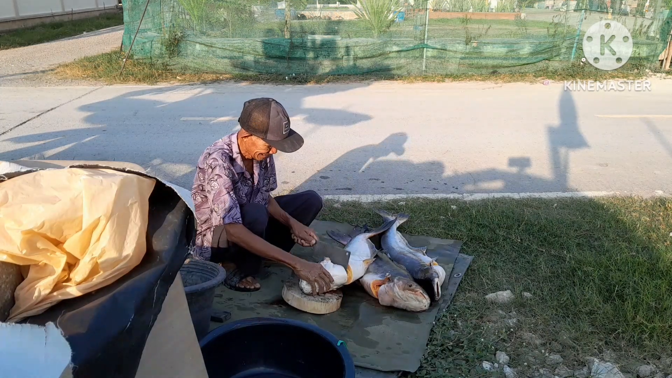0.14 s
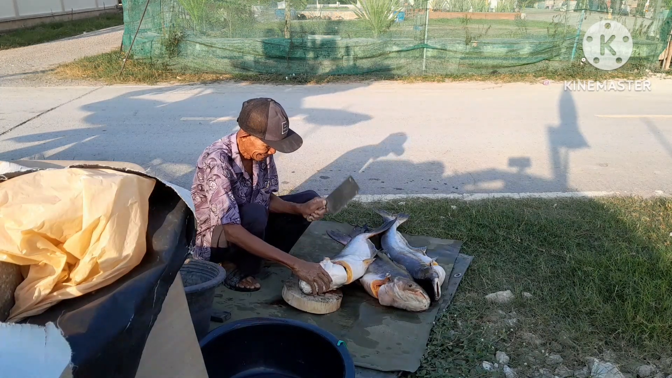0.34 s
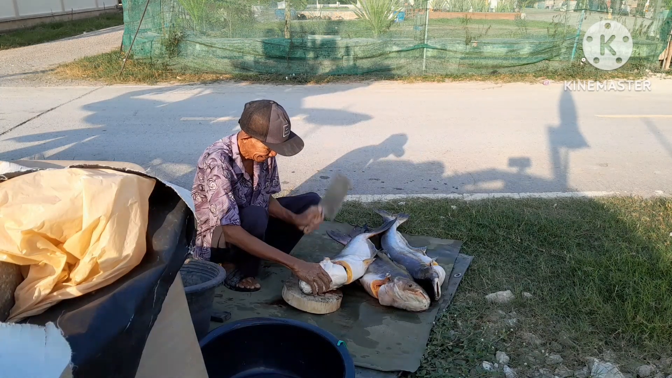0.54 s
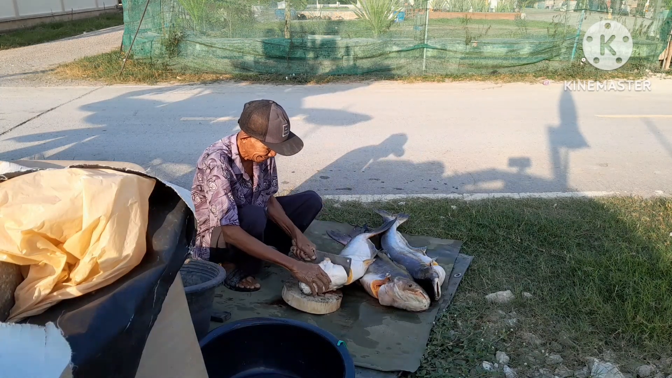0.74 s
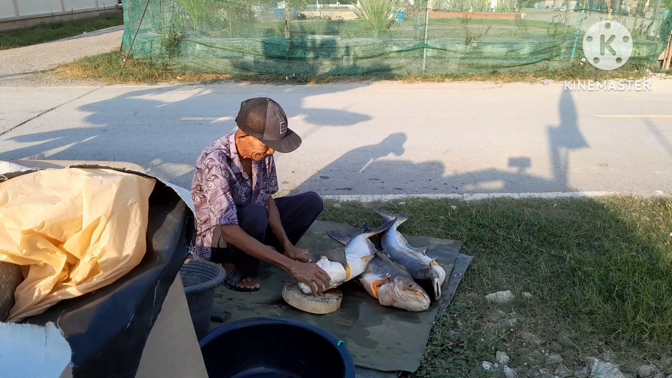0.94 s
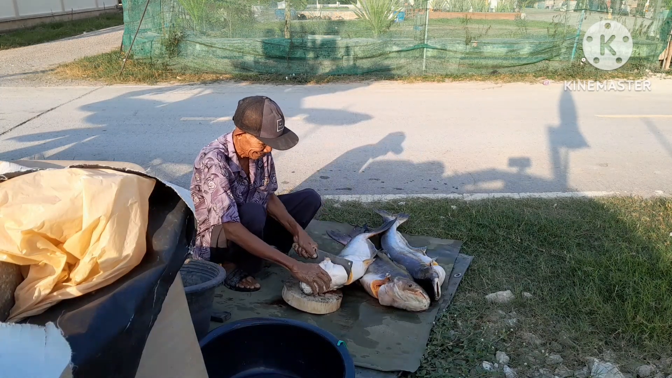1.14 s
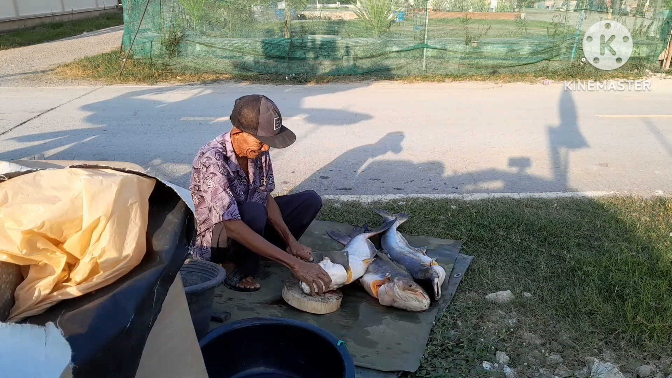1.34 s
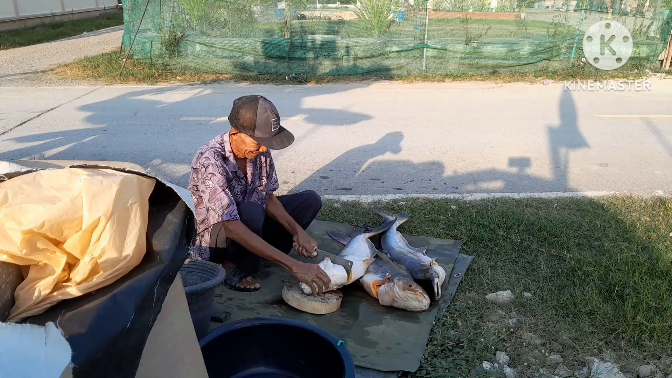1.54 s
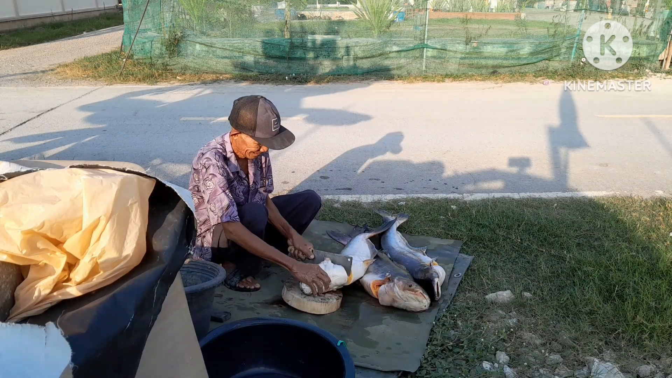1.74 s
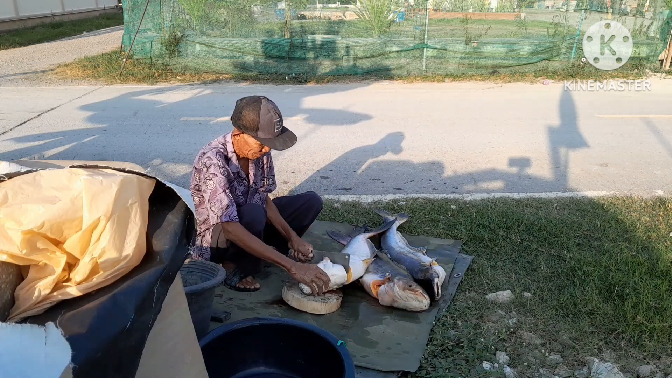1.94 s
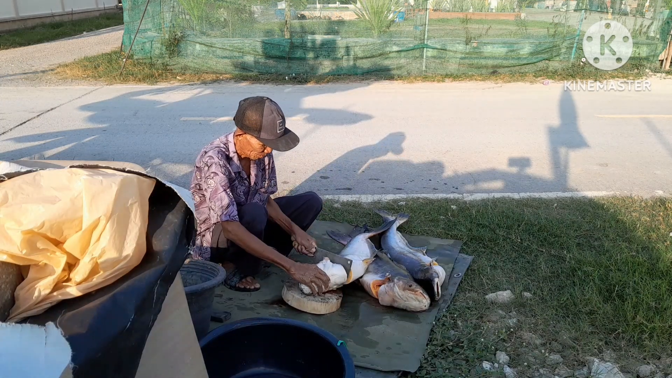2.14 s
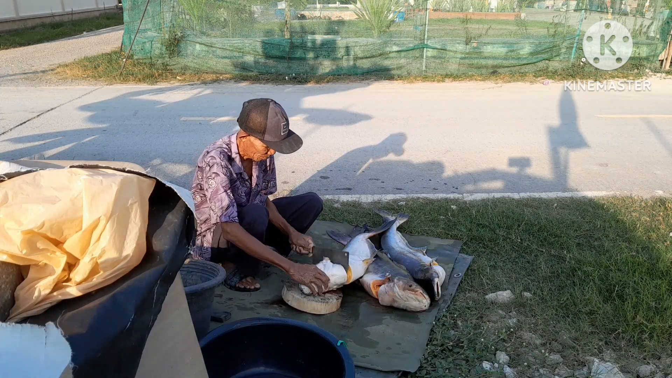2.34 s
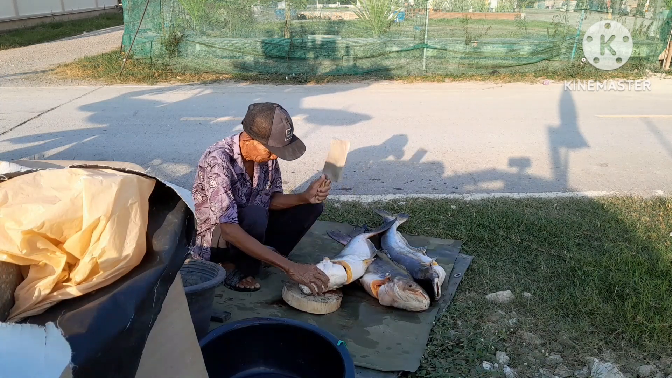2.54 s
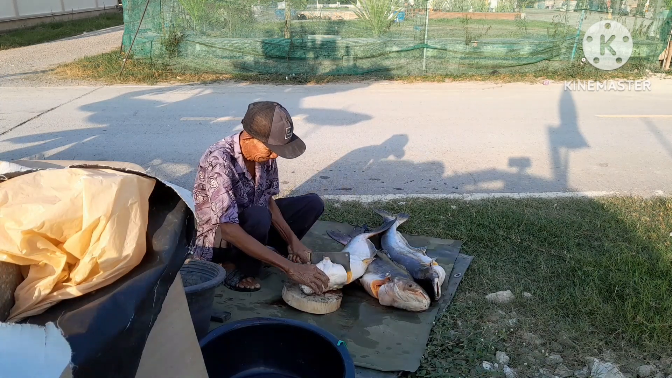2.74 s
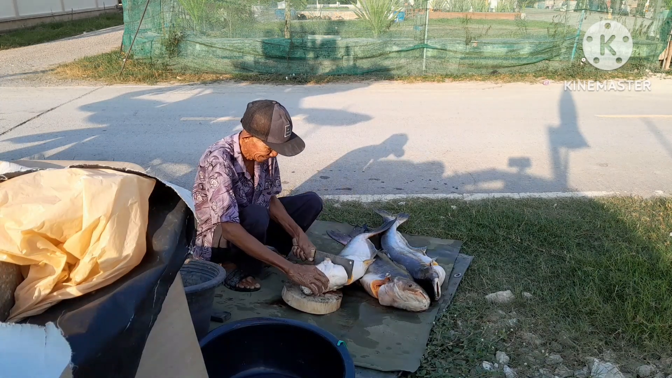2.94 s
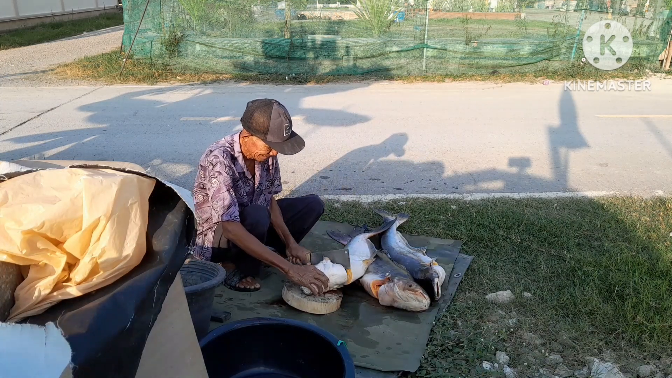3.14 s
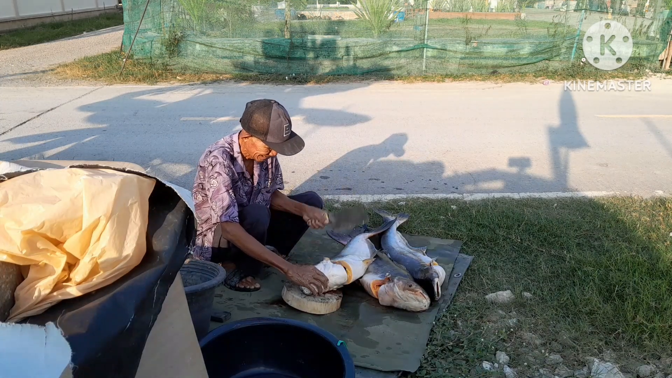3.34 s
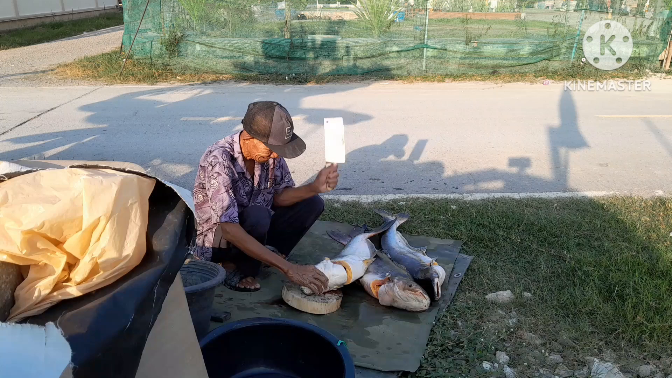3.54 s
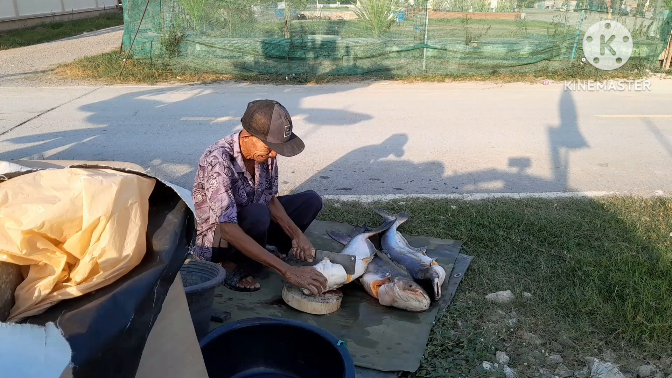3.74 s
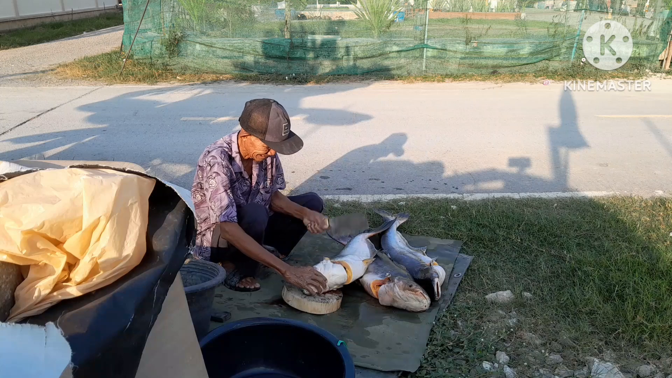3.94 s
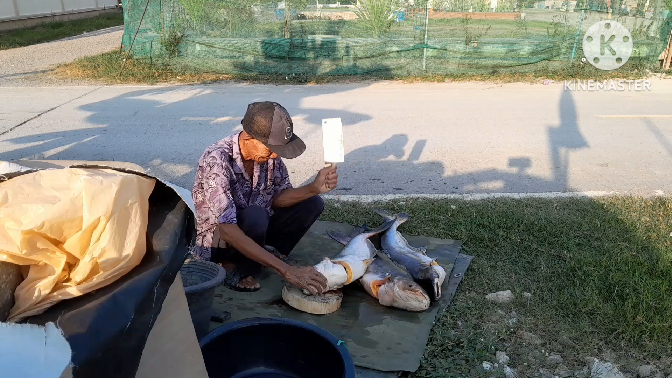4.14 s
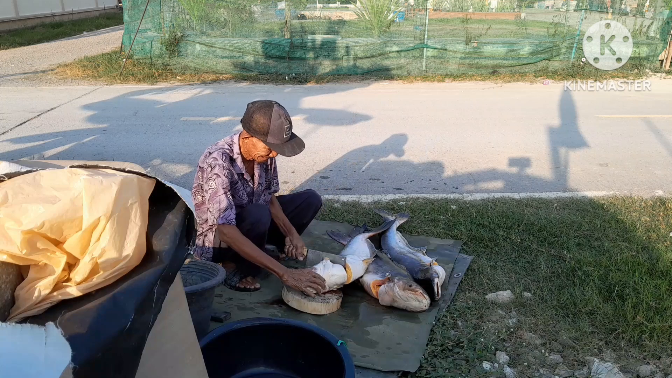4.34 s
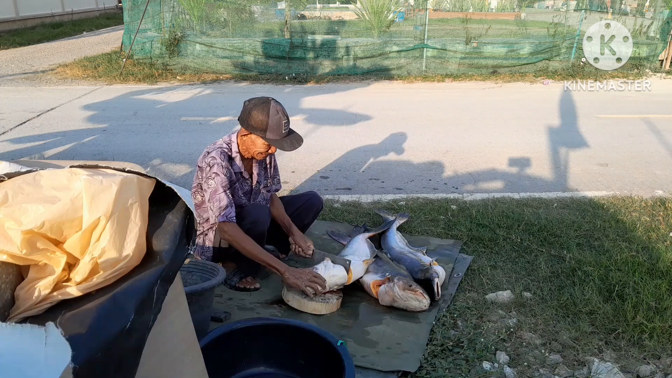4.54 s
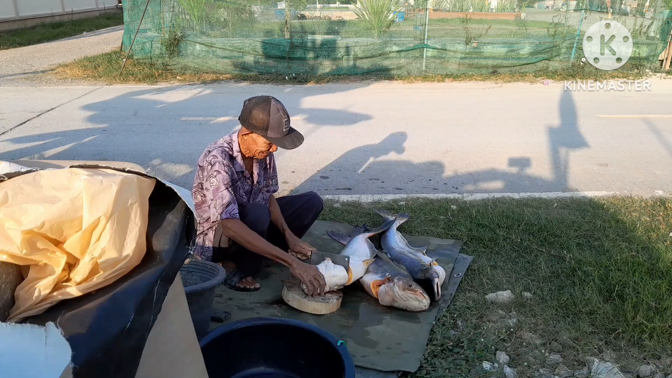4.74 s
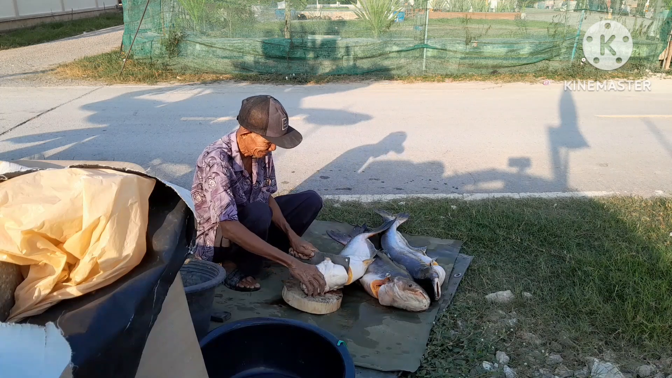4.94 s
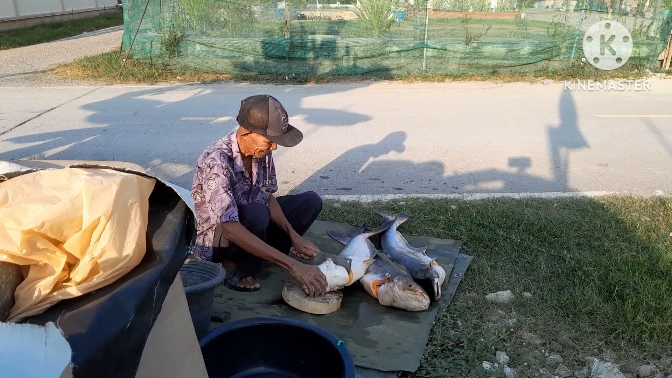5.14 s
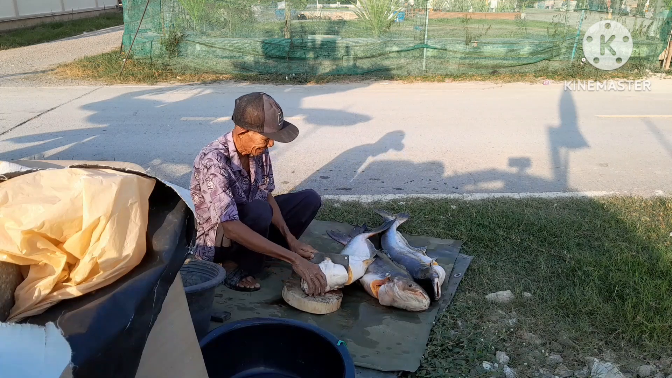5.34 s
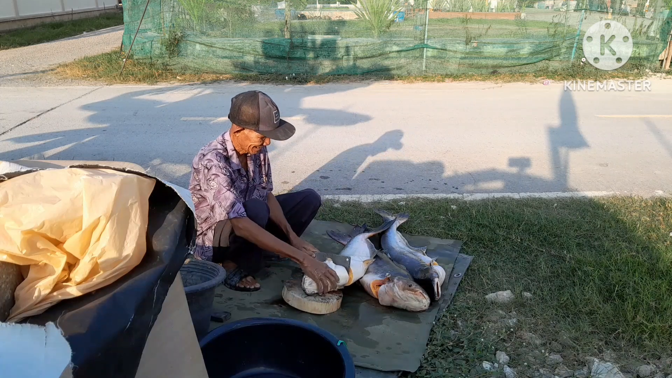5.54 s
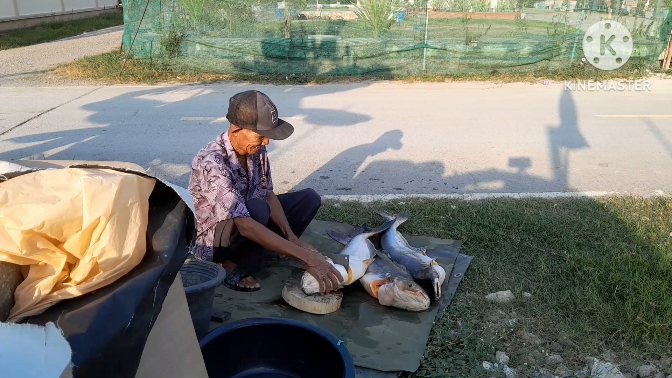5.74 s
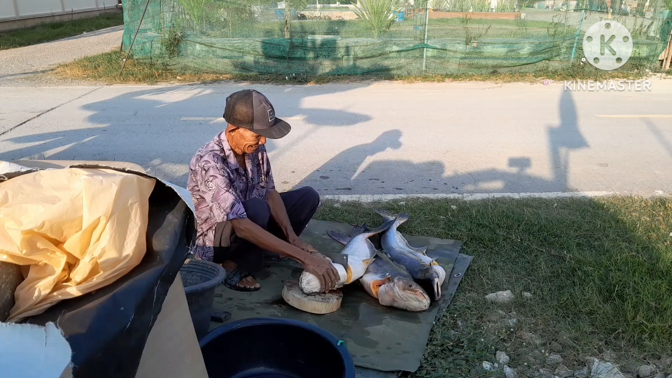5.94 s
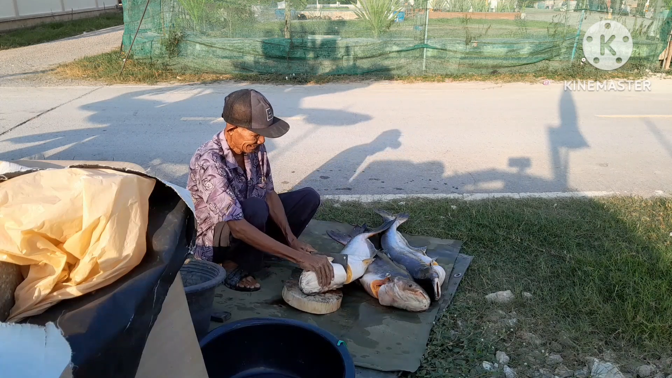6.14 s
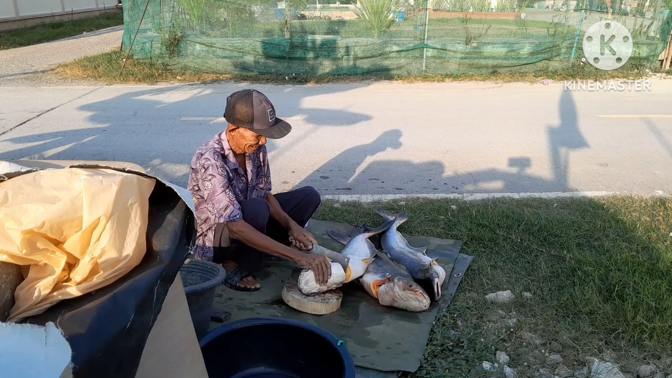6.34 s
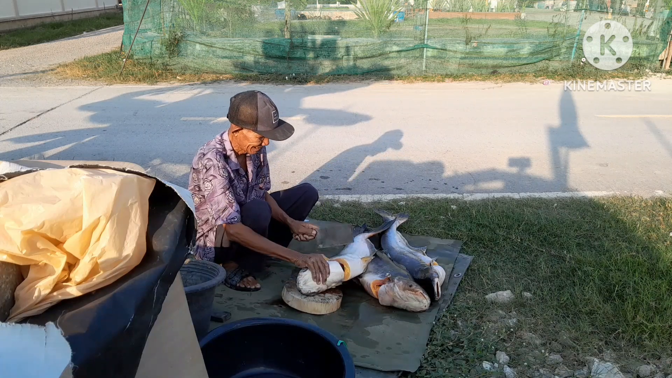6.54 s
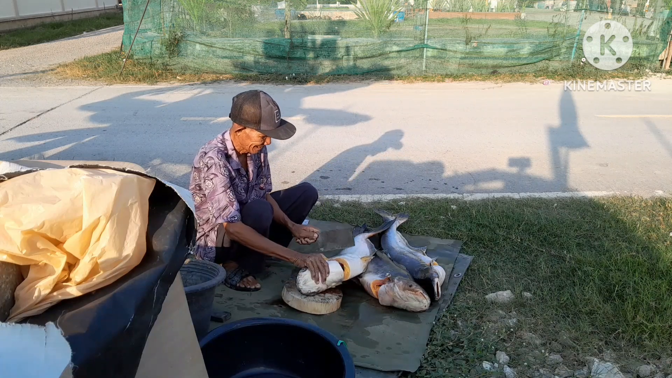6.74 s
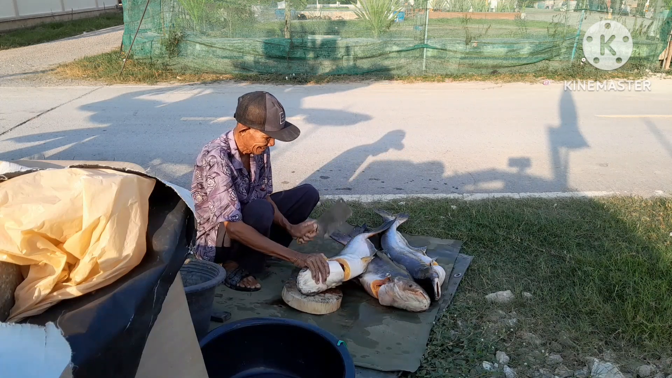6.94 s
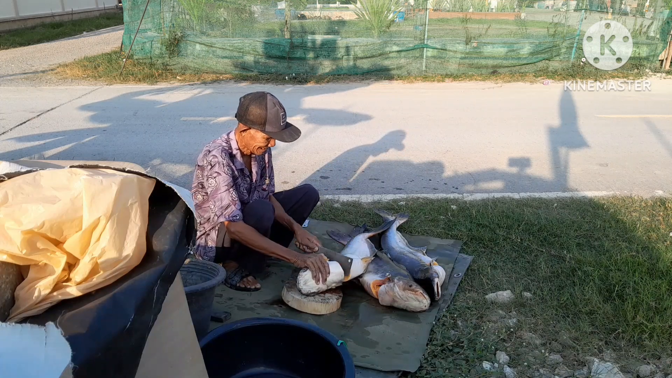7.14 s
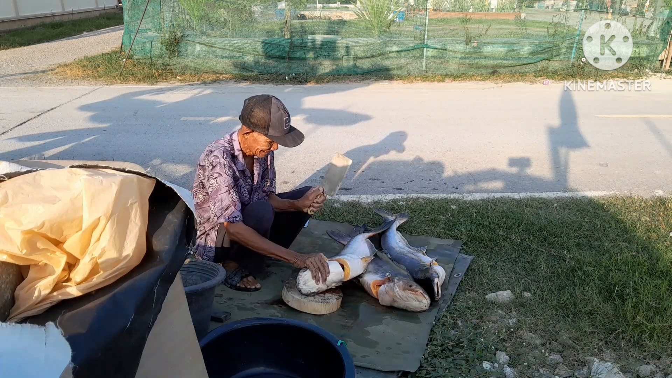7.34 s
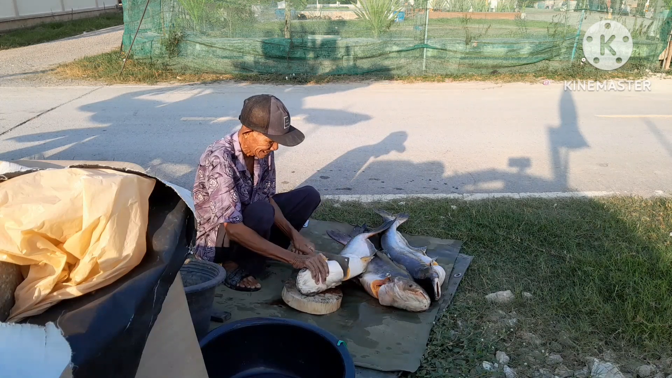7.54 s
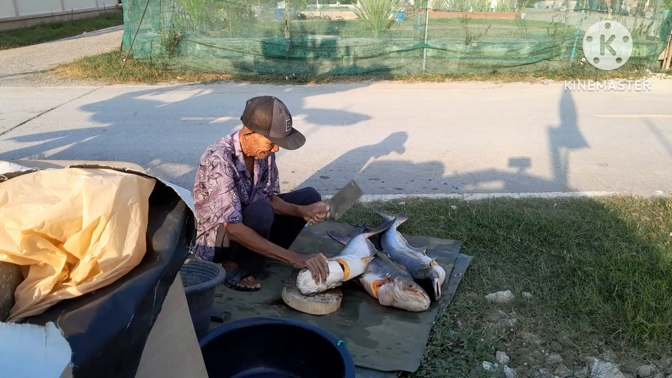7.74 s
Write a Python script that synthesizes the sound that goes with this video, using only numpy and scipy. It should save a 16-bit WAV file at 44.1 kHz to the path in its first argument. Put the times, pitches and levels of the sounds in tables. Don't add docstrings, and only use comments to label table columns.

```python
import sys
import numpy as np
from scipy import signal
from scipy.fft import rfft, irfft, next_fast_len
from scipy.io import wavfile
from scipy.ndimage import uniform_filter1d, map_coordinates

SR = 44100
rng = np.random.default_rng(int(sys.argv[2]) if len(sys.argv) > 2 else 0)


def volts_from_decibels(level):
    exponent = np.asarray(level, float) / 20
    return 10 ** exponent


def wrap_up_sound(samples):
    columns = np.atleast_2d(samples).T
    tamed = np.clip(columns, -1, 1)
    steps = np.round(tamed * 32767).astype(np.int16)
    wavfile.write(sys.argv[1], SR, steps)


N = 343980


def unit(x):
    return x / np.sqrt(np.mean(x ** 2) + 1e-20)


def along(points, hz):
    f, v = np.transpose(points)
    return np.interp(np.log(hz + 1), np.log(f + 1), v)


def wobble(rate, size=N):
    return map_coordinates(rng.standard_normal(size // 100 + 4), [np.arange(size) * rate / SR])


def filtered(x, response):
    m = next_fast_len(x.shape[-1] + 4096)
    return irfft(rfft(x, m) * response(np.fft.rfftfreq(m, 1 / SR)), m)[..., :x.shape[-1]]


def add(track, s, x):
    part = track[..., max(round(s * SR), 0):][..., :x.shape[-1]]
    part += x[..., :part.shape[-1]]


def tail(decays, rise_s):
    hz, t, z = signal.stft(rng.standard_normal((2, SR // 3)), SR, nperseg=128)
    patches = rng.standard_normal(z.shape[1:])
    patches = uniform_filter1d(uniform_filter1d(patches, size=6, axis=0), size=4, axis=1)
    decay_db = -60 * t / along(decays, hz)[:, None]
    gain = volts_from_decibels(4.2 * unit(patches) + decay_db) * (1 - np.exp(-t / rise_s))
    cloud = signal.istft(z * gain, SR, nperseg=128)[1]
    return cloud / np.linalg.norm(cloud[0])


def blade_ring(f, modes):
    width_hz = 300
    return 1 + sum(gain * 1j * f * width_hz / (hz * hz - f * f + 1j * f * width_hz) for hz, gain in modes)


def thuds():
    # start in seconds, frequency in Hz, peak in dB, t60 in seconds, attack in seconds.
    modes = [(.684, 285, -22.5, 0.047, .001), (.681, 695, -24.5, 0.041, 0.0017),
             (.69, 108, -26, 0.068, 0.0025), (.6795, 520, -24, .022, .0015), (.686, 430, -27, .045, .0015),
             (2.8272, 326, -12, 0.034, 0.0004), (2.827, 540, -25, .03, .0005), (2.817, 700, -36, .03, .002),
             (2.83, 165, -28, .06, .002), (2.826, 670, -21, 0.034, 0.00051),
             (3.7315, 720, -21, 0.03, .0015), (3.732, 200, -24, 0.03, .0015), (3.724, 500, -25, .03, .003),
             (3.735, 118, -27, .15, .003), (4.3373, 307, -10, 0.024, 0.00066),
             (4.337, 683, -21.5, 0.029, 0.0005), (4.339, 125, -26, .08, 0.003), (4.34, 230, -24, .04, .002),
             (7.099, 320, -17, 0.029, .001), (7.097, 718, -28, 0.042, 0.0019),
             (7.1, 141, -22.5, 0.061, 0.0022), (7.579, 1800, -32, .03, .001), (7.5745, 745, -22, .03, .001),
             (7.574, 880, -29, .02, .001), (7.578, 250, -25, 0.05, .002), (7.617, 590, -30, .045, .004)]
    # start in seconds, final frequency in Hz, peak in dB,
    # t60 in seconds, attack in seconds.
    hollow = (7.5758, 620, -6.5, .05, .007)
    block, t = np.zeros(N), np.arange(SR // 4) / SR
    sag = 0.071 * np.exp(-t / .008)
    climb = -.74 * np.exp(-t / .0046)
    for (s, hz, db, t60, attack), bend in [(row, sag) for row in modes] + [(hollow, climb)]:
        phase = 2 * np.pi * np.cumsum(hz * (1 + bend)) / SR
        add(block, s, volts_from_decibels(db - 60 * t / t60) * (1 - np.exp(-t / attack)) * np.sin(phase))
    return block


def chops():
    # start in seconds, peak in dB, lead-in in seconds, t60 in seconds, brightness in dB per octave.
    crunch = [
        (.6815, -23.5, .002, .024, -.2),
        (2.826, -23, .0085, .013, .8),
        (3.728, -20.5, 0.0061, .02, 3.6),
        (4.3365, -21.5, .005, .012, 2),
        (4.3477, -26, .001, .012, 3),
        (7.095, -22.5, .0008, .022, -.5),
        (7.5746, -19, 0.00045, .019, .3),
        (7.1015, -36, .002, .012, 4),
    ]
    # frequency in Hz, gain as a ratio.
    grips = [
        [(1110, 2.2), (2380, 2.2), (4600, 1.3), (7200, .8)],
        [(3010, 1.5), (4400, 3), (4800, 1.5), (9300, 1.2), (14000, 1.5)],
        [(2020, 1.2), (3030, 1.2), (4340, 1.8), (4920, 2.2), (7270, .8), (13400, 1.0)],
        [(1220, 1.2), (2490, 1.1), (3040, 2.4), (7420, .9), (10800, 1.2)],
        [(5400, 1.3), (3600, .9)],
        [(1770, 1.2), (3010, 2.2), (3910, 1.5), (4860, 1.5)],
        [(2720, 2.6), (3240, 1.5), (4930, 1.2), (5900, 1.6), (9900, 1.2)],
        [(5000, 1.2)],
    ]
    # frequency in Hz, level in dB.
    bone = [(300, -25.5), (800, -5.5), (1150, 5), (1600, 8.5), (3200, 1.5), (6000, -1), (10000, -5),
            (15000, -10)]
    # frequency in Hz, half of left over right in dB.
    lean = [(300, .3), (700, .8), (1300, -.3), (2400, 1.5), (4400, -.5), (8100, -1.2), (15000, 0)]
    # frequency in Hz, level in dB.
    flesh = [(80, -29), (200, 1.5), (500, 2.5), (900, -7), (1500, -29.5)]
    # frequency in Hz, t60 in seconds.
    yard = [(150, .2), (1000, 0.37), (3000, 0.4), (6000, 0.36), (12000, .36)]
    block, out = thuds(), np.zeros((2, N))
    t = np.arange(SR // 5) / SR - .02
    for (s, db, lead, t60, tilt_db), modes in zip(crunch, grips):
        start = s + t[0]
        snaps = rng.standard_normal((3, len(t))) * volts_from_decibels(4 * rng.standard_normal(len(t)))
        snaps[0, np.argmin(np.abs(t))] = 4.5
        entry = volts_from_decibels(32 * t.clip(max=0) / lead) * (t > -lead)
        force = np.where(t < 0, entry, volts_from_decibels(-60 * t / t60) + volts_from_decibels(-25 - 60 * t / .07))

        def colour(f):
            return volts_from_decibels(along(bone, f) + tilt_db * np.log2((f + 1) / 3000)) * blade_ring(f, modes)

        crack = filtered(unit(snaps) * force, colour) * volts_from_decibels(db - 5)
        spread = filtered(crack[1:], lambda f: 1.75 * f / (f + 4000))
        near = filtered(crack[0] + spread, lambda f: volts_from_decibels(along(lean, f) * [[1], [-1]]))
        add(out, start, near)
        slats = rng.standard_normal((2, SR // 200)) * np.hanning(SR // 200)
        add(out, start + .0315, volts_from_decibels(-35.5) * signal.fftconvolve(near, slats, axes=1))
        add(out, s, volts_from_decibels(db - .5) * filtered(tail(yard, rise_s=0.04), colour))
        slap = rng.standard_normal(len(t)) * np.where(t < 0, entry, volts_from_decibels(-60 * t / 0.056))
        add(block, start + .003, volts_from_decibels(db + 4) * filtered(slap, lambda f: volts_from_decibels(along(flesh, f))))
    add(out, .0338, volts_from_decibels(-24.5) * block)
    wet = signal.fftconvolve(block[None], tail(yard, rise_s=.02), axes=1)[:, :N]
    return out + block * volts_from_decibels(0) * volts_from_decibels([[.6], [-.6]]) + volts_from_decibels(-21) * wet


def touches():
    # start in seconds, peak in dB.
    strokes = [
        (0.604, -59),
        (0.9752, -49.5),
        (2.2014, -63),
        (3.2326, -64.5),
        (6.3804, -54),
    ]
    out, t = np.zeros((2, N)), np.arange(SR // 10) / SR
    for s, db in strokes:
        stroke = volts_from_decibels(db - 5.5 - 60 * t / .2) * (1 - np.exp(-t / .005))
        add(out, s - .004, filtered(stroke * rng.standard_normal((2, len(t))), lambda f: f / (f + 4000)))
    return out


def far(s, call, hz, out, wet_db, lag_s=0):
    # frequency in Hz, t60 in seconds.
    trees = [(1000, 0.53), (4000, .45), (8000, 0.23)]
    side_db = rng.uniform(-1.5, 1.5)
    add(out[0], s + lag_s, volts_from_decibels(side_db) * call)
    add(out[1], s, volts_from_decibels(-side_db) * call)
    t = np.arange(SR // 3) / SR
    decay = volts_from_decibels(-60 * t / along(trees, hz)) * (1 - np.exp(-t / 0.024))
    cloud = rng.standard_normal((2, len(t))) * decay
    echoes = signal.fftconvolve(call[None], cloud, axes=1)
    add(out, s, volts_from_decibels(wet_db) / np.linalg.norm(cloud[0]) * echoes)


def note(rows, partials, shake_hz, flutter_db):
    s, hz, db = np.transpose(rows)
    t = np.arange(s[0], s[-1], 1 / SR)
    pitch = np.interp(t, s, hz) + shake_hz * wobble(90, size=len(t))
    phase = 2 * np.pi * np.cumsum(pitch) / SR
    level = volts_from_decibels(np.interp(t, s, db) + flutter_db * wobble(40, size=len(t)))
    level = level * signal.windows.tukey(len(t), .2)
    return level * sum(volts_from_decibels(g_db + 7.5) * np.sin(k * phase) for k, g_db in partials)


def sing(out, rows, wet_db, lag_s=0, **voice):
    far(rows[0][0], note(rows, **voice), rows[0][1], out, wet_db, lag_s)


def held(s, length, hz, db, peak, sag_hz_per_s=0):
    share = np.array([0, peak, peak + .3 * (1 - peak), 1])
    levels = db - np.array([14, 0, 3, 16])
    return np.transpose([s + length * share, hz - sag_hz_per_s * length * share, levels])


def whistlers():
    # time from its start in seconds, pitch in Hz, level in dB.
    rise = [(0, 3650, -8), (.07, 3740, -2), (.14, 4120, 0), (.21, 4310, -3), (.3, 4260, -11)]
    fall = [(0, 4260, -7), (.05, 4080, 0), (.11, 3830, -1), (.19, 3270, 1)]
    # start in seconds, level in dB, pitch shift in Hz.
    rises = [
        (.2, -74, -20),
        (3.84, -72, 0),
        (7.32, -66, 60),
    ]
    falls = [
        (.52, -70, 60),
        (4.15, -69, -20),
        (7.585, -61.5, -60),
    ]
    # start in seconds,
    # length in seconds, pitch in Hz, peak in dB, share of the length before the peak.
    flat_notes = [(.88, .22, 3390, -69, .3), (4.51, .2, 3230, -68, .15), (5.84, .2, 3110, -63, .7),
                  (6.04, .2, 3110, -78, .5), (6.55, .22, 3040, -62, .75), (6.78, .13, 3040, -71, .15),
                  (7.19, .16, 2940, -58, .35), (7.36, .2, 2930, -63, .1),
                  (1.34, .13, 3730, -81, .6), (3.05, .09, 3550, -78, .5), (3.3, .1, 3600, -74, .4),
                  (3.6, .12, 3780, -77, .6), (4.6, .22, 3700, -71, .4), (4.91, .12, 4400, -72, .25),
                  (6.26, .21, 3700, -70, .25), (7.33, .2, 3700, -70, .3)]
    low_notes = [(0, .14, 2790, -64.5, .05), (.14, .16, 2720, -67, .15), (.3, .2, 2560, -70, .75),
                 (1.14, .15, 2960, -72, .4), (3.87, .1, 2660, -73, .4), (4.72, .11, 2550, -71, .25),
                 (7.4, .17, 2760, -74, .4), (7.6, .11, 2840, -60, .25), (7.75, .08, 2700, -60, .4)]
    high_notes = [
        (1.82, .15, 7600, -86, .35),
        (4.0, .19, 7620, -85, .3),
    ]
    # start in seconds, length in seconds, first pitch in Hz, last pitch in Hz, level in dB.
    sweeps = [(6.2, .08, 5900, 3830, -71), (5.17, .05, 6100, 4600, -75), (3.44, .1, 4000, 3500, -73),
              (3.96, .07, 2720, 2300, -74), (3.19, .06, 4050, 3700, -77), (1.96, .03, 3700, 3250, -76),
              (2.0, .035, 3750, 3250, -71), (2.03, .02, 3250, 3500, -72), (2.04, .03, 2250, 2300, -77),
              (2.045, .02, 2800, 2750, -77), (1.99, .03, 2150, 1800, -79), (.485, .05, 3550, 4150, -74),
              (.31, .07, 3750, 3600, -73), (.16, .12, 3480, 3520, -76), (4.2, .04, 4050, 3900, -68),
              (4.17, .06, 3950, 3100, -78), (2.075, .1, 5200, 5350, -87), (2.63, .07, 4000, 2800, -73),
              (5.27, .09, 4300, 3750, -75), (4.5, .03, 5000, 4950, -75), (5.55, .04, 2950, 2900, -77)]
    out = np.zeros((2, N))
    for half, sung in [(rise, rises), (fall, falls)]:
        for s, db, hz in sung:
            sing(out, np.add(half, (s, hz, db)), partials=[(.93, -14), (1, -5.5), (1.04, -16)],
                 shake_hz=36, flutter_db=3.5, wet_db=-4.0)
    clear = [held(*row) for row in flat_notes]
    for s, length, a, b, db in sweeps:
        clear.append([(s, a, db - 3), (s + length / 3, (2 * a + b) / 3, db), (s + length, b, db - 5)])
    for rows in clear:
        sing(out, rows, partials=[(.96, -17), (1, -5.5)], shake_hz=40, flutter_db=3.5, wet_db=-3.5)
    for row in low_notes + high_notes:
        sing(out, held(*row, sag_hz_per_s=650), partials=[(1, -5.5), (1.1, -17)],
             shake_hz=50, flutter_db=3, wet_db=-4.5)
    return out


def sparrows():
    # start in seconds, level in dB, first pitch in Hz.
    falling = [(0, -72, 5600), (.25, -73, 5500), (.56, -65.5, 6000), (0.967, -64.5, 5700),
               (1.456, -66, 5600), (1.775, -69.5, 4700), (2.562, -73, 5500), (2.88, -63, 4100),
               (3.081, -74, 4800), (3.285, -67.5, 4800), (3.447, -71, 3200), (3.63, -75, 5300),
               (4.19, -71, 5600), (4.48, -71, 6700), (4.685, -61, 5400), (4.91, -63, 4700),
               (5.07, -65, 5100), (5.182, -67, 6200), (5.27, -71, 6100), (5.58, -72, 3250),
               (5.72, -72.5, 5800), (5.97, -71, 6000), (6.201, -63, 6000), (6.43, -66, 5300),
               (6.64, -66.5, 5450), (6.76, -63, 5700), (6.92, -71, 5700), (7.43, -66.5, 6000)]
    # start in seconds, level in dB, first pitch in Hz, last pitch in Hz, length in seconds.
    odd = [
        (.5, -64, 3800, 5600, 0.047),
        (1.013, -75, 2100, 1840, 0.083),
        (1.16, -74, 6400, 5380, 0.048),
        (2.171, -62, 4300, 2200, 0.056),
        (2.637, -61.5, 4600, 2010, 0.054),
        (7.51, -58, 4300, 6000, 0.046),
    ]
    out = np.zeros((2, N))
    for s, db, start_hz, end_hz, length in [(s, db, hz, .7 * hz, .054) for s, db, hz in falling] + odd:
        u = np.linspace(0, 1, round(1.6 * length * SR))
        strands = .3 * np.array([[-1], [0], [1]])
        glide = (start_hz + end_hz) / 2 + (end_hz - start_hz) * (.35 * (u - .5) + strands)
        rasp = 0.13 * (start_hz - end_hz) * np.array([wobble(260, size=len(u)) for _ in range(3)])
        voice = np.sin(2 * np.pi * np.cumsum(glide + rasp, axis=1) / SR).sum(axis=0)
        far(s - .005, volts_from_decibels(db - 5) * np.sin(np.pi * u ** .7) ** 2 * voice, start_hz, out, wet_db=-3)
    return out


def syllable(s, hold, swoop, db, top_db):
    low_hz, high_hz = 1335, 1510
    lift = np.array([0, 0, .1, .95, 1, 0]) * min(swoop / .15, 1)
    times = s + np.array([0, hold / 3, hold, hold + .45 * swoop, hold + .78 * swoop, hold + swoop])
    levels = db + top_db * lift - 6 * np.array([1.3, .3, 0, .3, 0, 1.1])
    return np.transpose([times, low_hz + (high_hz - low_hz) * lift, levels])


def cuckoo():
    # start in seconds, hold in seconds, swoop in seconds, level in dB, top over hold in dB.
    syllables = [
        (2.1, .1, .19, -69, -1),
        (2.43, .07, .2, -73, 6),
        (3.47, .22, .01, -78, -3),
        (5.05, .2, .27, -64, -7),
        (5.5, .06, .22, -77, 9),
    ]
    out = np.zeros((2, N))
    for row in syllables:
        sing(out, syllable(*row), partials=[(1, -2)], shake_hz=8, flutter_db=1.5, wet_db=-5, lag_s=0.00017)
    return out


def roosters():
    # start in seconds, length in seconds, pitch in Hz, peak in dB,
    # share of the length before the peak.
    crow = [
        (5.8, .2, 1520, -80, .3),
        (6.25, .2, 1470, -75, .3),
        (6.48, .17, 1460, -77, .4),
        (7.44, .13, 1430, -70, .2),
    ]
    other_strands = [
        (6.8, .2, 1830, -70, .3),
        (6.47, .14, 1620, -74, .5),
        (6.86, .1, 1330, -73, .5),
        (5.44, .2, 1500, -74, .4),
        (5.36, .14, 1340, -75, .4),
    ]
    # time in seconds, pitch in Hz, level in dB.
    long_crow = [(6.73, 1420, -80), (6.79, 1530, -70), (6.86, 1590, -71), (6.92, 1580, -67),
                 (6.98, 1530, -70), (7.04, 1470, -70), (7.09, 1460, -76)]
    out = np.zeros((2, N))
    for rows in [held(*row) for row in crow] + [long_crow]:
        sing(out, rows, partials=[(.5, -4.5), (.9, -17), (1, -6)], shake_hz=22, flutter_db=3, wet_db=-3.0)
    for row in other_strands:
        sing(out, held(*row), partials=[(.95, -15), (1, -8), (1.06, -16)],
             shake_hz=22, flutter_db=2.5, wet_db=-2.5)
    return out


def rush(spectrum, patchy_db):
    # frequency in Hz, left-right correlation.
    alike = [(60, 0.93), (130, 0.98), (290, 0.76), (640, 0.47), (1410, -0.6), (3100, 0.78), (6820, -0.1),
             (15000, 0.29)]
    z = signal.stft(rng.standard_normal((2, N)), nperseg=512)[2]
    field = rng.standard_normal(z.shape[1:])
    field = uniform_filter1d(uniform_filter1d(field, size=5, axis=0), size=12, axis=1)
    pair = signal.istft(z * volts_from_decibels(patchy_db * unit(field)), nperseg=512)[1][:, :N]

    def mid_side(hz):
        turn = np.arccos(np.clip(along(alike, hz), -1, 1)) / 2
        return volts_from_decibels(along(spectrum, hz)) * [np.cos(turn), np.sin(turn)]

    mid, side = filtered(pair, mid_side)
    return unit(np.array([mid + side, mid - side]))


def traffic():
    # time in seconds, level in dB.
    road = [(0.0, -51), (1.67, -50), (2.13, -49), (2.63, -52), (2.93, -49), (3.3, -52), (3.6, -49),
            (4.34, -48), (4.86, -52), (5.15, -47), (5.47, -49), (5.91, -46), (6.15, -49), (7.8, -48)]
    # time of passing in seconds, whine in dB, half width in seconds.
    passes = [
        (.5, -79, .2),
        (2.4, -65.5, .35),
        (3.55, -73, .25),
        (5.15, -77, .15),
        (6.35, -76, .2),
        (6.9, -73, .3),
        (7.35, -72, .3),
    ]
    # frequency in Hz, density in dB per Hz.
    rumble_spectrum = [(12, -72.5), (20, -34), (24, -21.5), (35, -8), (65, 0), (123, 0), (182, -6),
                       (217, -7), (352, -22.5), (500, -24), (650, -47.5), (1100, -120)]
    wash_spectrum = [(120, -36), (200, -5), (264, -5), (387, -11.5), (640, -16.5), (1000, -26.5),
                     (1300, -54.5), (2200, -120)]
    whine_spectrum = [(550, -22), (750, -5), (1000, 0), (1350, -2), (2200, -18), (3500, -42)]
    t = np.arange(N) / SR
    road_db = np.interp(t, *np.transpose(road))
    passing = volts_from_decibels(-86) + sum(volts_from_decibels(db) * np.exp(-((t - s) / width) ** 2) for s, db, width in passes)
    rumble = volts_from_decibels(road_db + 1.5 + .8 * wobble(4.5)) * rush(rumble_spectrum, patchy_db=1)
    tyres = volts_from_decibels(.6 * (road_db - road_db.mean()) - 60) + volts_from_decibels(-1) * passing
    wash = volts_from_decibels(.5) * tyres * volts_from_decibels(.8 * wobble(6)) * rush(wash_spectrum, patchy_db=1.5)
    whine = passing * rush(whine_spectrum, patchy_db=2.0)
    return rumble + wash + whine


def flock():
    # time in seconds, level in dB.
    chatter = [(0, -86), (.22, -80), (.5, -74), (1.15, -83), (1.9, -90), (2.69, -75), (2.93, -84),
               (3.28, -80), (3.87, -77), (4.32, -82), (4.52, -72), (4.84, -80), (5.15, -73), (5.6, -75),
               (6.05, -81), (6.41, -70), (7.39, -72), (7.58, -66)]
    # frequency in Hz, density in dB per Hz.
    flock_spectrum = [(2400, -39), (3200, -10), (4000, -0.5), (5200, -6), (6200, -13.5), (7500, -44)]
    flock_db = np.interp(np.arange(N) / SR, *np.transpose(chatter))
    return volts_from_decibels(flock_db + 1.5 + 1.5 * wobble(11)) * rush(flock_spectrum, patchy_db=3.5)


def hiss():
    # frequency in Hz, density in dB per Hz.
    hiss_spectrum = [(710, -34), (1200, -2), (1850, -9), (2240, -12), (3480, -13), (3670, -11.5),
                     (4410, -27), (6430, -16), (15700, -18.5)]
    return volts_from_decibels(-74.5) * rush(hiss_spectrum, patchy_db=1.5)


def scene():
    birds = whistlers() + sparrows() + cuckoo() + roosters()
    return chops() + touches() + birds + traffic() + flock() + hiss()


def roll_off(x):
    return signal.sosfilt(signal.butter(12, 16650, fs=SR, output="sos"), x)


def record(dry):
    top_hz = 15800

    def edges(f):
        bass_db = along([(20, -14.5), (32, -7), (50, 0)], f)
        return volts_from_decibels(bass_db - 40 * np.clip((f - top_hz) / 1100 + .4, 0, 1))

    mix = filtered(dry, edges)
    return roll_off(mix)


dry = scene()
out = record(dry)
wrap_up_sound(out)
```